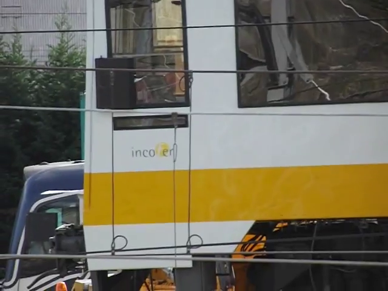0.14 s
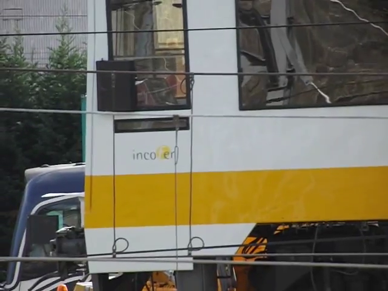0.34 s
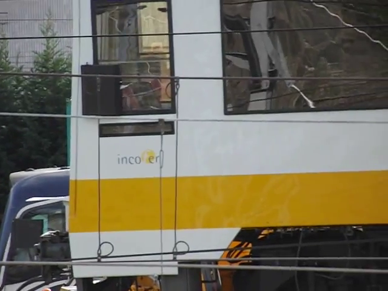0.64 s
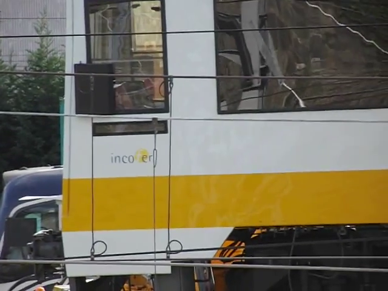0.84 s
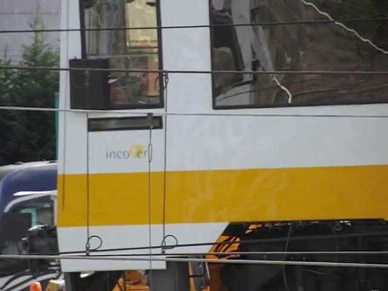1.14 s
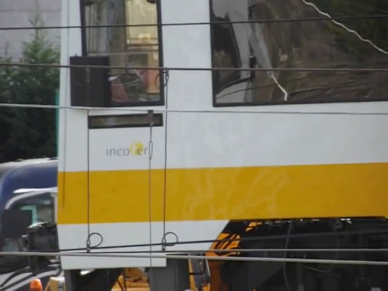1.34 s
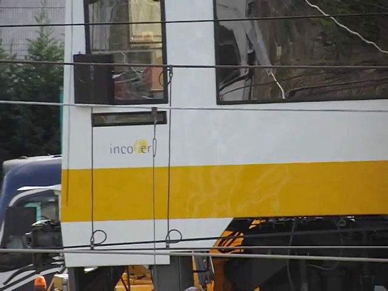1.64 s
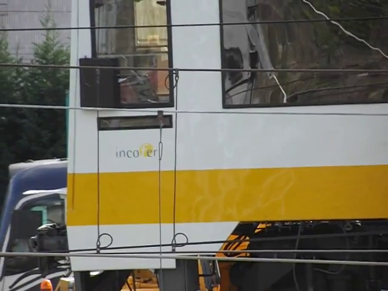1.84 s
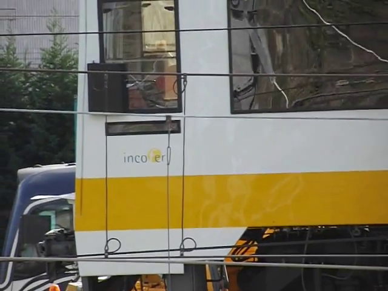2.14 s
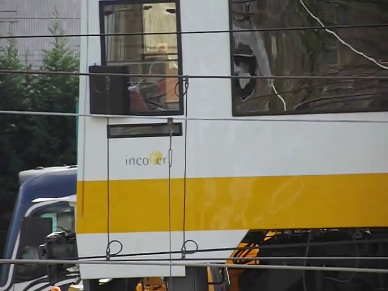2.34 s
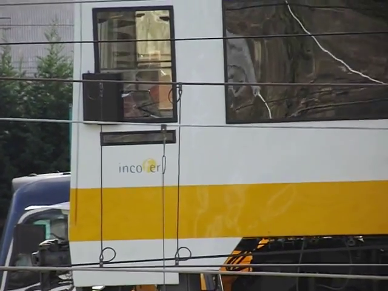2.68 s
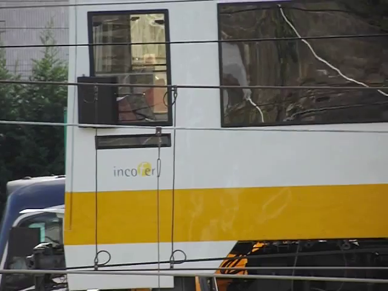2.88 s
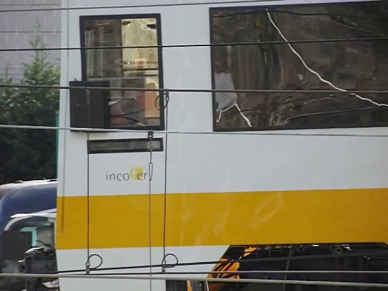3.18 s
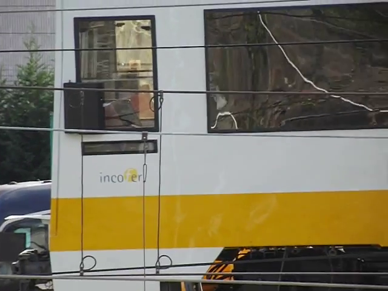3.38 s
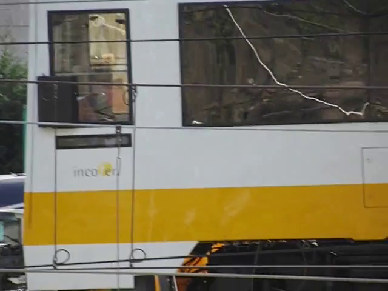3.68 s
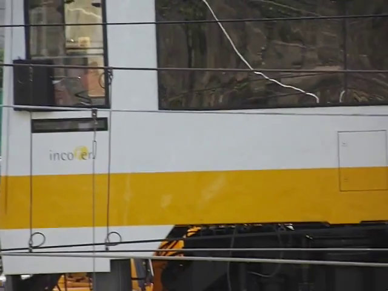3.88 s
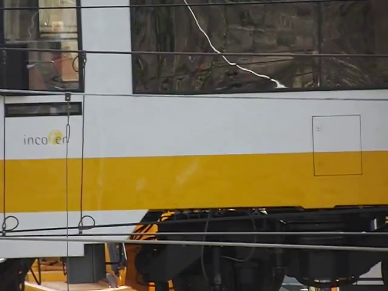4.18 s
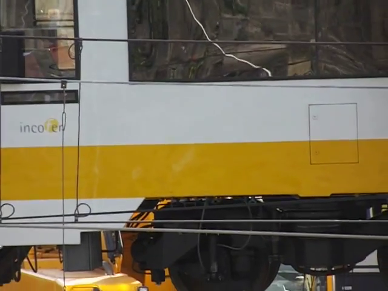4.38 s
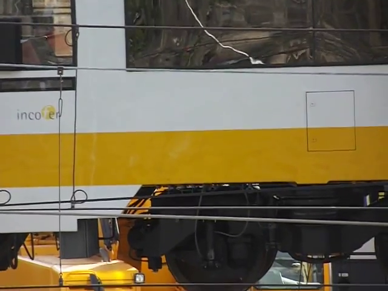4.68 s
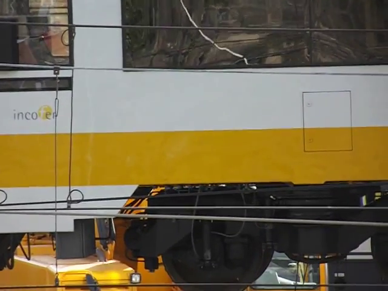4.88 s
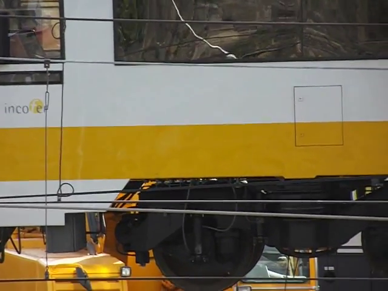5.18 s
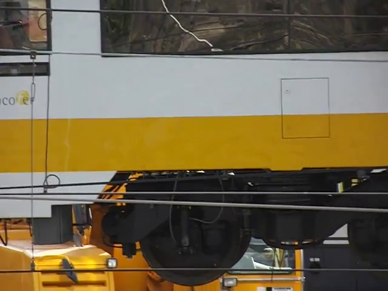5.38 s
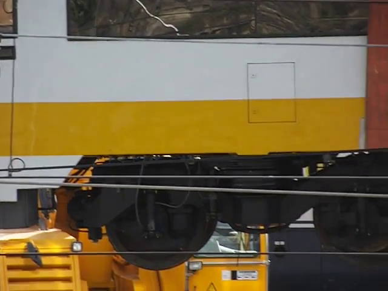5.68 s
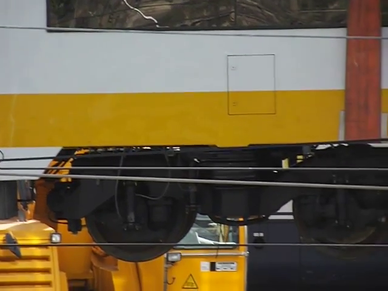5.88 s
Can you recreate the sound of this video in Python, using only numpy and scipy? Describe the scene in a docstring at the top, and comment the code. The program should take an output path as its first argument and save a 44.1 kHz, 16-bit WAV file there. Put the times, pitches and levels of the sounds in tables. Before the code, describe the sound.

Labouring diesel engine with hydraulic hum and thin whine lifts a rail car; early wind knocks, brief rasps, then hissing metal scrapes.

```python
"""A mobile crane's diesel labours in a workshop yard, its firings throbbing and clattering as sums of shaft
harmonics and pulsed noise, under a pump's hum and a thin whine. Early on, wind knocks on the microphone of a
small camera, as pressure pulses and low noise, and short rasps sound as bursts of ragged noise. From 1 s the
hydraulic pump lifts a rail car and the shaft slows a little; from about 2 s a scraping hiss comes in surges of
resonant noise, with one bright spurt. Hollow rushes swell throughout, and gusts return near the end."""
import sys
import numpy as np
from scipy import signal
from scipy.fft import rfft, irfft
from scipy.io import wavfile
from scipy.ndimage import uniform_filter1d

SR = 44100
rng = np.random.default_rng(int(sys.argv[2]) if len(sys.argv) > 2 else 0)


def wav_out(sig):
    """Save sig, one row per channel (or a flat mono array), as 16-bit PCM at SR to the path in sys.argv[1]."""
    wavfile.write(sys.argv[1], SR, np.round(np.clip(np.atleast_2d(sig).T, -1, 1) * 32767).astype(np.int16))


N = 265482

# The load rises evenly between two times and drags the crankshaft down (turns per second)
LOAD_FROM_S, LOAD_FULL_S, SHAFT_HZ, SAG_HZ = 1.0, 5.4, 19.78, 0.98
# Harmonics of the shaft, 2 being the firing: order, peak_level_db
SHAFT_ORDERS = [(2, -33), (3, -54), (4, -49), (7, -59), (12, -54), (14, -50), (17, -49.5), (18, -50.5),
                (21, -60.5)]
# Low roar of the engine: time_s, level_db
ROAR_LEVEL = [(0, -33.5), (1.2, -32), (3.8, -32.5), (4.4, -34.2), (5.1, -30.5), (5.6, -31.5), (6.02, -28.5)]
# Spectrum of exhaust and engine body: frequency_hz, relative_density_db
BODY_COLOUR = [(15, -11.5), (28, 6.5), (50, 0), (80, -1), (120, -6), (200, -4.5), (300, -7.5), (420, -10),
               (560, -14.5), (800, -20), (1500, -54.5)]
# Exhaust pipe resonances: frequency_hz, width_hz, height_db
PIPE_MODES = [(280, 23, 3), (334, 7.5, 4.5), (382, 15, 2)]
# Spectrum of block and covers: frequency_hz, relative_density_db
COVER_COLOUR = [(350, -38), (600, -10.5), (700, -4), (850, 0), (1050, -4), (1350, -7), (2050, -12),
                (2450, -9.5), (3200, -11), (4050, -15), (4350, -19.5), (4850, -23), (5500, -32.5),
                (6300, -38.5), (7200, -63)]
# Panel resonances: frequency_hz, width_hz, height_db
PANEL_MODES = [(810, 99, 2.5), (1010, 99, 2), (2270, 80, 2), (2668, 98, 5), (2796, 120, 5), (3656, 200, 6)]
CLATTER_DB = -33.5
FIRING_SPREAD_LIMIT = 1.8  # bound on the strength of a firing, in standard deviations

PUMP_DB, PUMP_FADE_DB = -37.5, 6.5  # hum before the lift, and its loss at full load
WHINE_HZ, WHINE_WAVER_HZ, WHINE_DB = 2807, 2, -50.5

# Surges of scraping: start_s, length_s, level_db
SCRAPE_SURGES = [(1.99, 0.47, -39), (2.34, 0.36, -35), (2.81, 0.24, -36), (3.045, 0.35, -31.5),
                 (3.58, 0.4, -34.5), (3.7, 0.24, -32.5), (5.145, 0.23, -32), (5.815, .2, -27.5)]
# Spectrum of the scraping: frequency_hz, relative_density_db
SCRAPE_SPECTRUM = [(150, -14), (280, 1), (420, 8), (560, -13), (900, 9.5), (1300, -8.5), (1650, 0),
                   (2100, 1), (3000, 0), (3700, 3.5), (4200, -5), (4800, -14), (5500, -39.5), (6300, -29.5),
                   (7200, -48)]
# Resonances of the scraped metal: frequency_hz, width_hz, height_db
METAL_MODES = [(325, 26, 5), (452, 30, 6), (900, 50, 3), (1640, 40, 3), (1787, 45, 7), (2370, 50, 4),
               (3190, 40, 5), (3384, 12, 7.5), (3590, 50, 4)]
SURGE_ATTACK_S, SURGE_FALL_DB_PER_S = 0.016, 59.5

# Short rasps: middle_s, half_length_s, level_db
RASP_EVENTS = [(.68, .012, -37.5), (.815, .014, -34), (.915, .018, -36), (1.125, .022, -29.5),
               (1.236, .012, -34.5), (1.362, .022, -29.3), (1.817, .008, -35.5), (1.94, .012, -36),
               (3.845, .01, -34), (5.977, .008, -32)]
# Spectrum of the rasps: frequency_hz, relative_density_db
RASP_SPECTRUM = [(900, -23), (1800, -10), (2300, 0.5), (2850, 3), (3450, -2), (3900, -13.5), (4800, -19),
                 (5600, -40), (7000, -50)]
# Spectrum of the bright spurt: frequency_hz, relative_density_db
SPURT_SPECTRUM = [(1500, -2), (3000, -1), (4800, -1), (5500, -22), (6300, -15), (7100, -41)]

# Swells of the hollow rush: middle_s, half_length_s, level_db
RUSH_SWELLS = [(1.2, 0.45, -35.5), (2.05, 0.31, -43), (3.8, 0.33, -47), (5.35, 0.51, -37.5)]
# Spectrum of the rush: frequency_hz, relative_density_db
RUSH_SPECTRUM = [(600, -25), (850, -1.5), (1050, 2.5), (1220, -2), (1400, -9.5), (2000, -34.5)]

# Gusts on the microphone: start_s, length_s, level_db
WIND_GUSTS = [(.02, 0.52, -28.5), (.66, 0.32, -30), (4.8, 0.085, -30), (5.08, 0.039, -24.5),
              (5.44, 0.045, -36), (5.69, 0.038, -21.5)]
# Spectrum of the wind: frequency_hz, relative_density_db
WIND_SPECTRUM = [(10, 1), (25, 4), (55, -3), (120, -8.5), (220, -19.5), (400, -36.5), (900, -55.5)]
# Eddies that hit the microphone: middle_s, half_length_s, core_suction_db (before the rebound is added)
WIND_EDDIES = [(0.1283, 0.0026, -1), (0.23, .0024, -10), (.3496, 0.0023, 3), (0.531, .008, -14),
               (0.697, 0.0052, -10), (0.742, 0.011, -15.5), (0.825, 0.0051, -3.5), (0.915, 0.008, -13),
               (4.18, 0.0098, -16.5), (5.139, 0.0052, -16), (5.733, 0.011, -8), (5.739, 0.0019, -11.5),
               (5.744, 0.0017, -10)]
GUST_ATTACK_S, GUST_FALL_DB_PER_S, BREEZE_DB = 0.017, 179, -43  # the breeze underlies the gusts
REBOUND_SHARE, REBOUND_WIDTH, REBOUND_LAG = 0.42, 2, 0.43  # width and lag in half lengths of the eddy

TOP_HZ = 7100  # edge of the steep treble cut


def diesel(turns):
    """Periodic forcing: shaft harmonics form the throb; firing pulses modulate the body and cover noise."""
    beat = firings(turns, scatter_db=8.5, decay_cycles=0.55)
    throb = 0
    for order, db in SHAFT_ORDERS:
        waver_db = 1.3 * walk(4)
        phase = 2 * np.pi * (order * turns + rng.random())
        throb = throb + undb(db + waver_db) * np.sin(phase)

    roar_s, roar_level_db = np.transpose(ROAR_LEVEL)
    roar_db = np.interp(np.arange(N) / SR, roar_s, roar_level_db)
    body = colour(noise() * (1 + 0.25 * beat), BODY_COLOUR, PIPE_MODES)
    body = body * undb(roar_db + 0.32 * walk(12))

    clatter = colour(noise() * (1 + 0.16 * beat), COVER_COLOUR, PANEL_MODES)
    clatter = clatter * undb(CLATTER_DB + 0.37 * walk(14))
    return throb + body + clatter


def firings(turns, scatter_db, decay_cycles):
    """Impulsive excitation: two firings a turn, of bounded random strength, each decaying exponentially."""
    cycle, phase = np.divmod(2 * turns, 1)
    chance = rng.standard_normal(int(cycle[-1]) + 1)
    chance = np.clip(chance, -FIRING_SPREAD_LIMIT, FIRING_SPREAD_LIMIT)
    strength = undb(scatter_db * chance)
    return unit(strength[cycle.astype(int)] * np.exp(-phase / decay_cycles))


def hydraulics(turns, load):
    """Pulsating flow: nine pistons a turn hum, fainter under load; a thin, slightly wavering whine rides above."""
    pistons = np.sin(2 * np.pi * 9 * turns) * undb(0.6 * walk(5))
    hum = unit(pistons) * undb(PUMP_DB - PUMP_FADE_DB * load ** 2)
    whine_hz = WHINE_HZ + WHINE_WAVER_HZ * walk(9)
    whine = np.sin(2 * np.pi * np.cumsum(whine_hz) / SR)
    return hum + unit(whine) * undb(WHINE_DB + 2.0 * walk(4.6))


def scraping():
    """Dry friction: dense random grains hiss in surges and excite the resonances of the metal."""
    force = envelope(SCRAPE_SURGES, SURGE_ATTACK_S, SURGE_FALL_DB_PER_S)
    grains = noise() * undb(1.4 * walk(400))
    unsteady_db = 0.9 * walk(30)
    return force * colour(grains, SCRAPE_SPECTRUM, METAL_MODES) * undb(unsteady_db)


def rasps():
    """Brief slips: bell-shaped bursts of noise, made ragged by rapid random changes of level."""
    force = sum(undb(db) * bump(middle, half) for middle, half, db in RASP_EVENTS)
    return force * colour(noise() * undb(1.8 * walk(410)), RASP_SPECTRUM)


def spurt():
    """Broadband noise in a single bell: one short, bright hiss."""
    return undb(-36.0) * bump(2.675, 0.028) * colour(noise(), SPURT_SPECTRUM)


def rush():
    """Turbulent flow: a hollow band of rushing air that swells and fades."""
    flow = sum(undb(db) * bump(middle, half) for middle, half, db in RUSH_SWELLS)
    return flow * colour(noise(), RUSH_SPECTRUM)


def wind():
    """Turbulent pressure on the microphone: gusts rumble and single eddies strike it as dull knocks."""
    strength = undb(BREEZE_DB) + envelope(WIND_GUSTS, GUST_ATTACK_S, GUST_FALL_DB_PER_S)
    knocks = sum(undb(db) * eddy(middle, half) for middle, half, db in WIND_EDDIES)
    return strength * colour(noise(), WIND_SPECTRUM) + knocks


def eddy(middle, half_length):
    """Vortex pressure: sharp suction in the core, then a wider, weaker rebound."""
    core = 1 / (1 + ((np.arange(N) / SR - middle) / half_length) ** 2) ** 2
    rebound = bump(middle + REBOUND_LAG * half_length, REBOUND_WIDTH * half_length)
    return REBOUND_SHARE * rebound - core


def envelope(events, attack_s, fall_db_per_s):
    """Incoherent addition: each event rises, holds and dies away; overlapping ones add in power."""
    t = np.arange(N) / SR
    power = 0
    for start, length, db in events:
        rise = np.clip((t - start) / attack_s, 0, 1)
        fall_db = fall_db_per_s * np.maximum(t - start - length, 0)
        power = power + (rise * undb(db - fall_db)) ** 2
    return np.sqrt(power)


def bump(middle, half_length):
    """Gaussian pulse: a smooth bell in time, down to 1/e at the half length."""
    return np.exp(-((np.arange(N) / SR - middle) / half_length) ** 2)


def colour(x, points, modes=()):
    """Linear filtering: a smooth spectrum with resonant peaks shapes x; rms 1."""
    f = np.fft.rfftfreq(N, 1 / SR)
    hz, db = np.transpose(points)
    shape_db = np.interp(np.log(f + 1), np.log(hz), db)
    for centre, width, peak_db in modes:
        shape_db = shape_db + peak_db / (1 + (2 * (f - centre) / width) ** 2)
    # roll-off beyond the ends of the spectrum
    treble_skirt = 1 / (1 + (f / (2 * hz[-1])) ** 4)
    bass_skirt = f / (f + hz[0] / 2)
    return unit(irfft(rfft(x) * undb(shape_db) * treble_skirt * bass_skirt, N))


def walk(rate):
    """Band-limited chance: random levels held 1 / rate s, smoothed twice over that time; rms 1."""
    hold = int(SR / rate)
    levels = np.repeat(rng.standard_normal(N // hold + 1), hold)
    smooth = uniform_filter1d(uniform_filter1d(levels, hold), hold)
    return unit(smooth[:N])


def noise():
    """White noise: equal mean power at all frequencies."""
    return rng.standard_normal(N)


def unit(x):
    """Normalisation to an rms of 1."""
    return x / np.sqrt(np.mean(x ** 2))


def undb(db):
    """Logarithmic level: decibels to amplitude gain."""
    return 10 ** (np.asarray(db) / 20)


def scene():
    """Superposition: one shaft drives engine and pump and sags under load; yard and wind sounds are added."""
    load = np.clip((np.arange(N) / SR - LOAD_FROM_S) / (LOAD_FULL_S - LOAD_FROM_S), 0, 1)
    shaft_hz = SHAFT_HZ - SAG_HZ * load
    turns = np.cumsum(shaft_hz * (1 + 0.001 * walk(6))) / SR
    crane = diesel(turns) + hydraulics(turns, load)
    yard = scraping() + rasps() + spurt() + rush()
    return (crane + yard + wind())[None]


def record(dry):
    """Limiting and low-pass filtering: the camera clips at full scale and cuts the treble steeply."""
    treble_cut = signal.ellip(10, 0.2, 80, TOP_HZ, fs=SR, output="sos")
    return signal.sosfilt(treble_cut, np.clip(dry, -1, 1))


dry = scene()
out = record(dry)
wav_out(out)
```